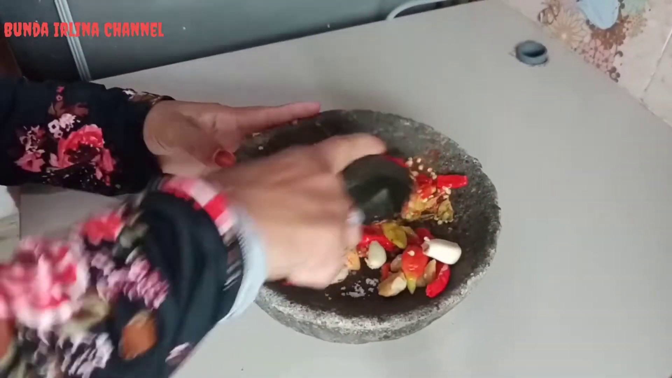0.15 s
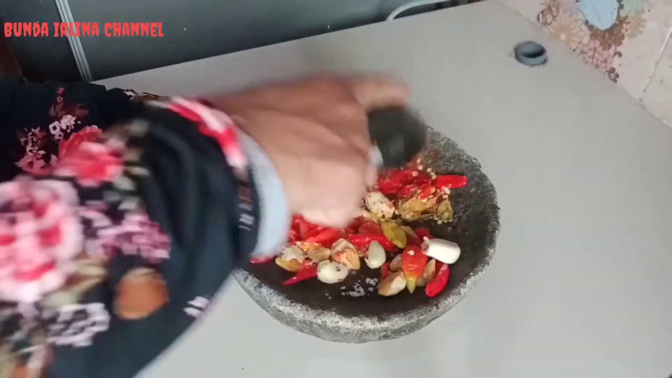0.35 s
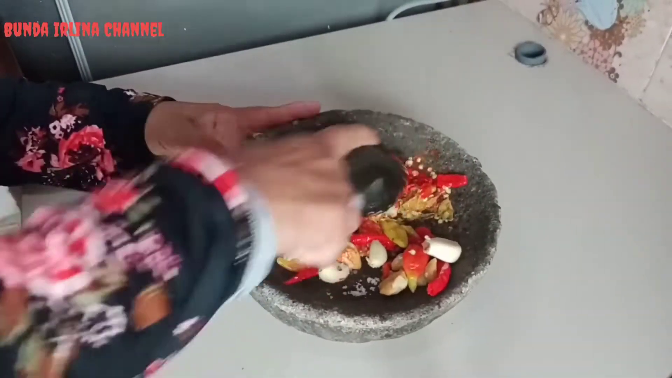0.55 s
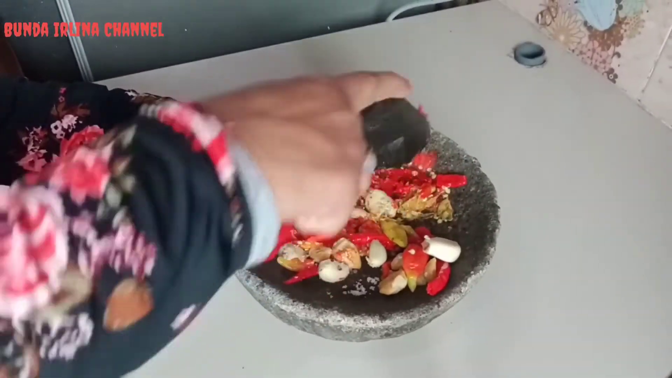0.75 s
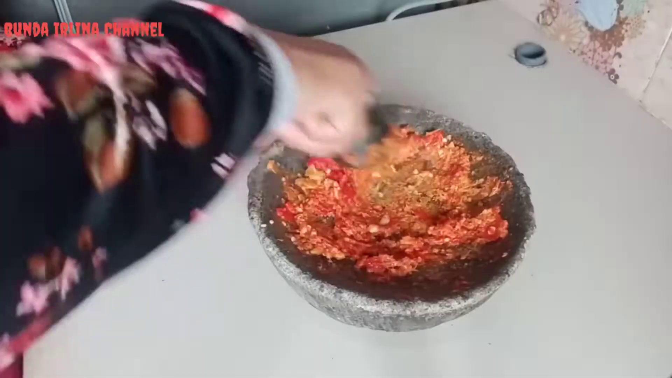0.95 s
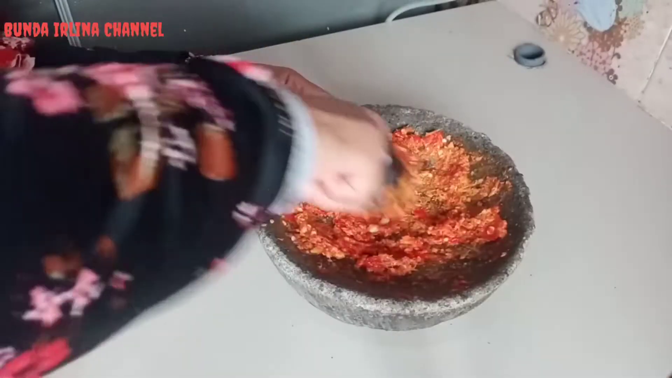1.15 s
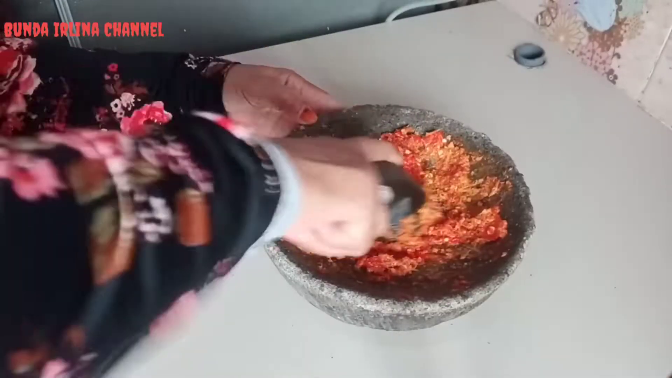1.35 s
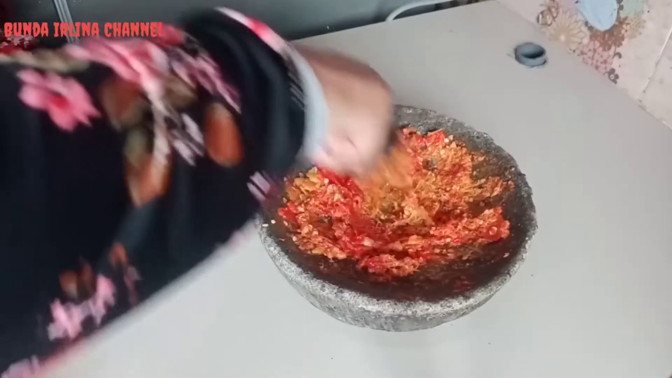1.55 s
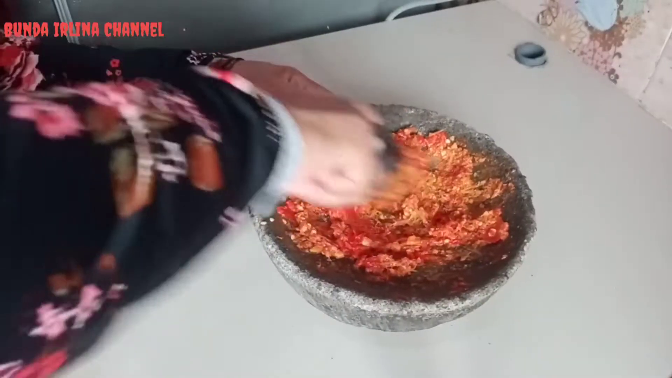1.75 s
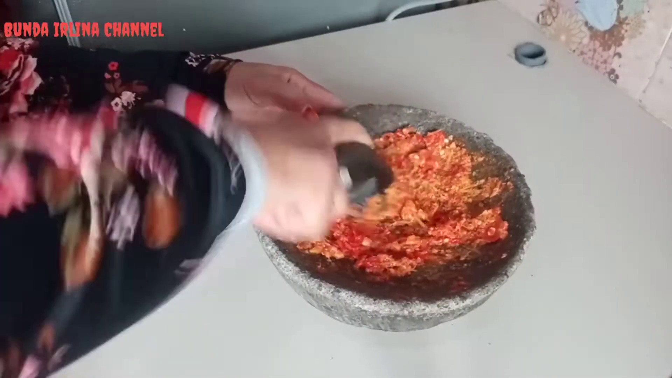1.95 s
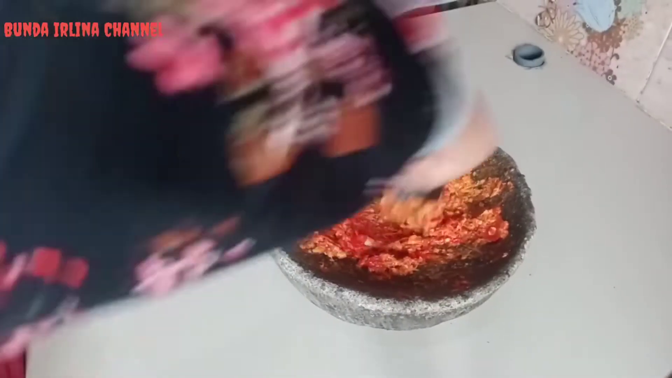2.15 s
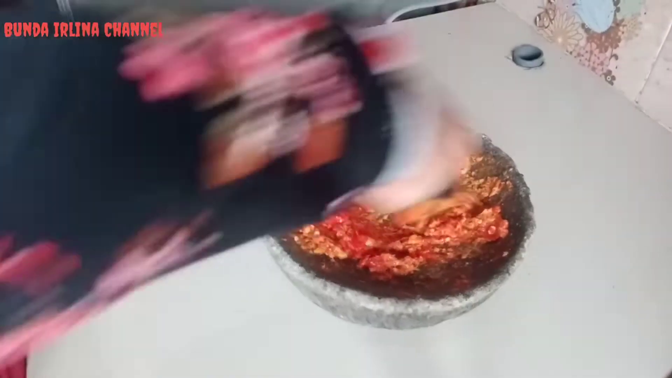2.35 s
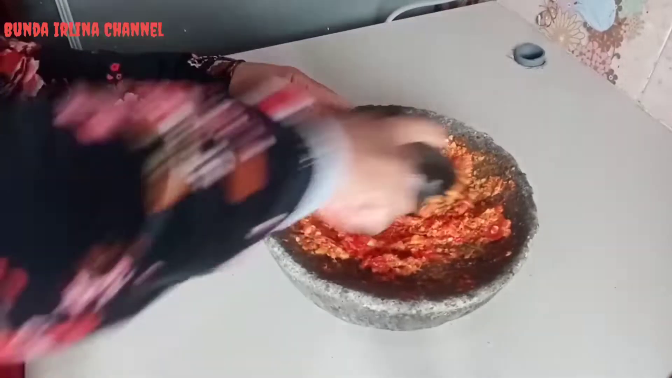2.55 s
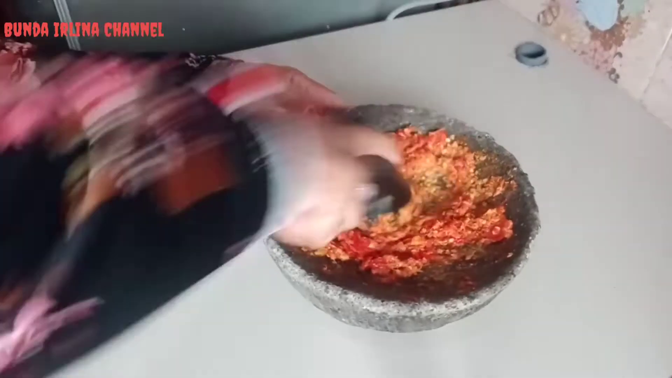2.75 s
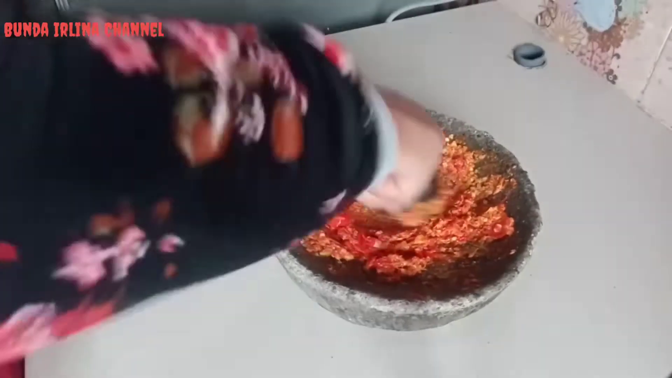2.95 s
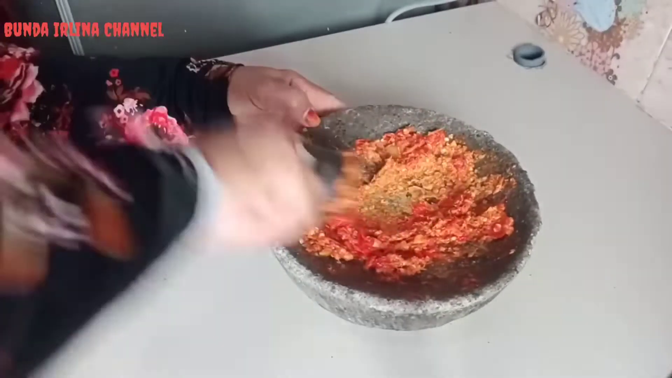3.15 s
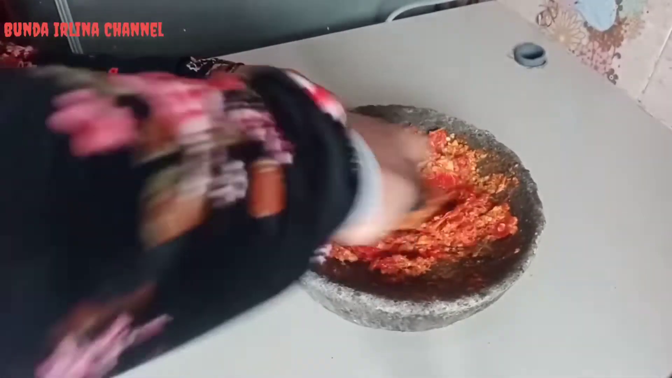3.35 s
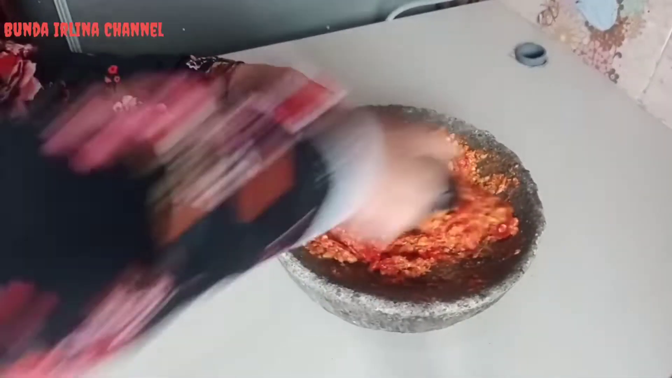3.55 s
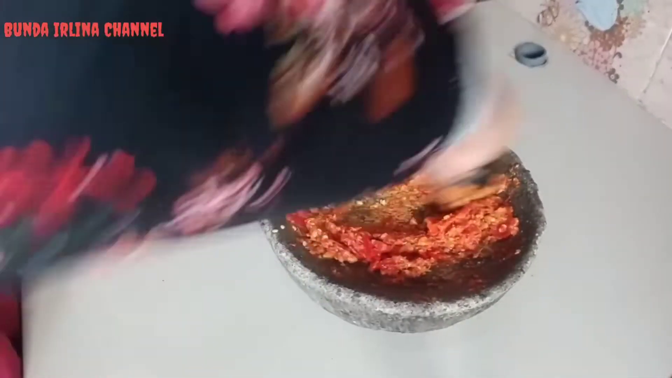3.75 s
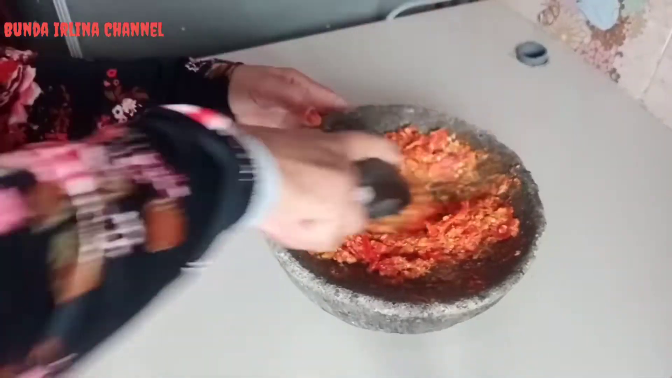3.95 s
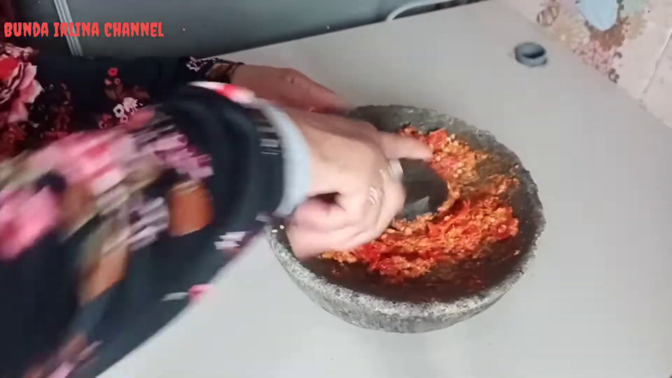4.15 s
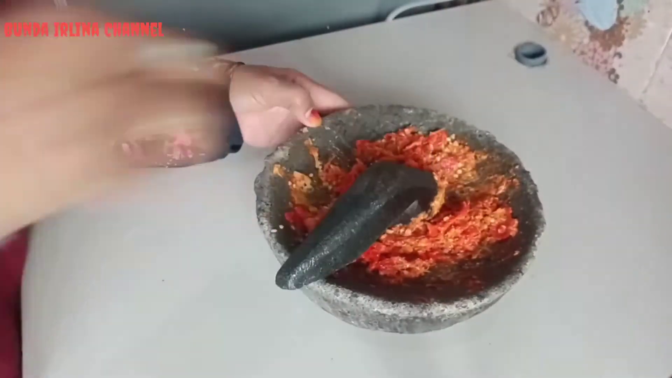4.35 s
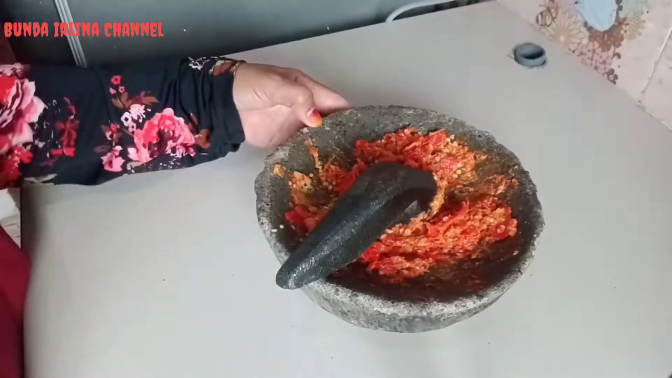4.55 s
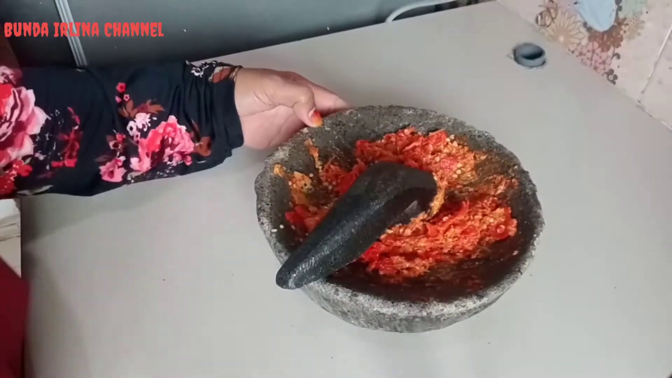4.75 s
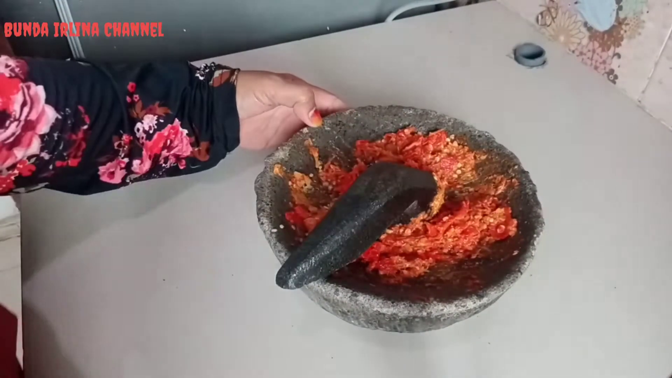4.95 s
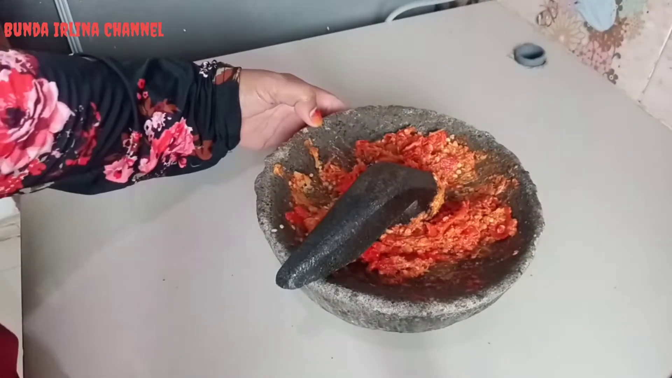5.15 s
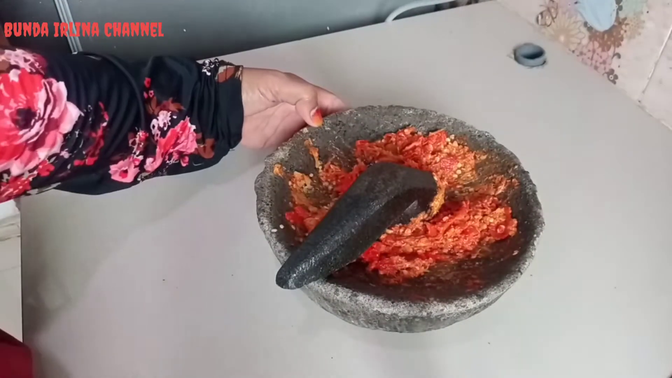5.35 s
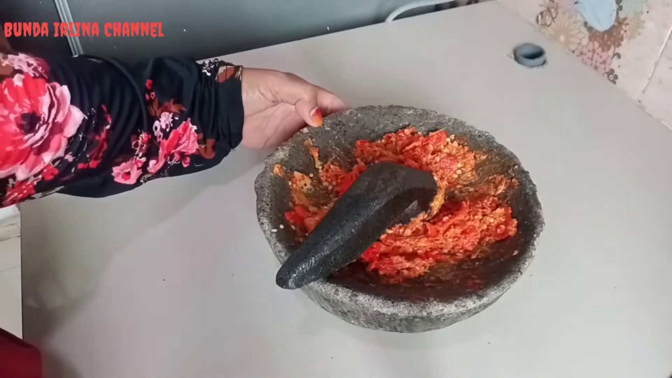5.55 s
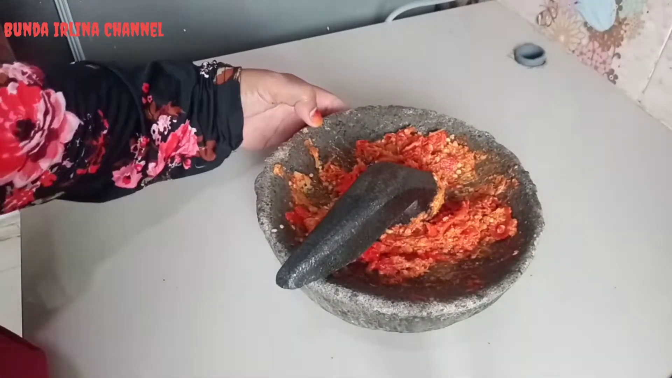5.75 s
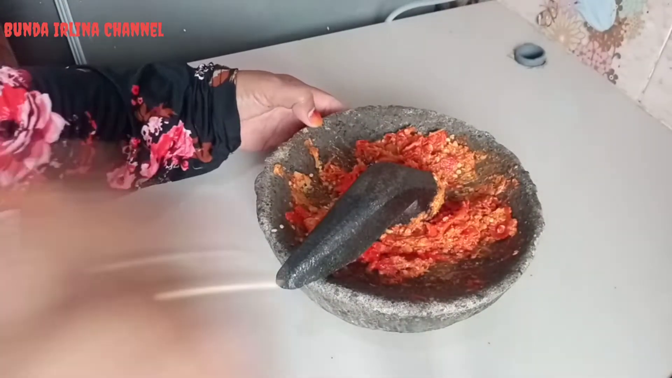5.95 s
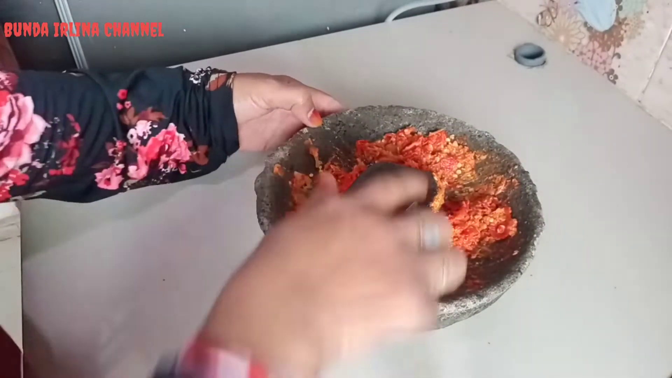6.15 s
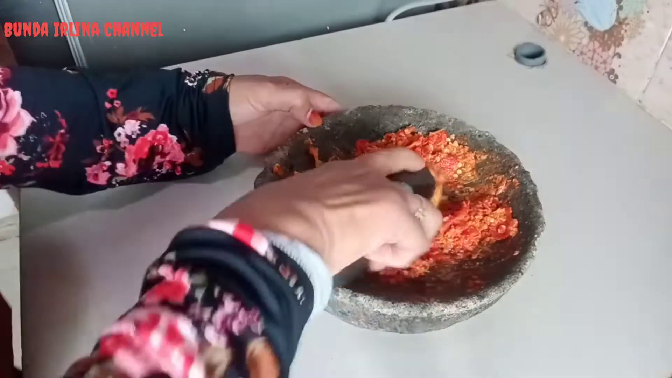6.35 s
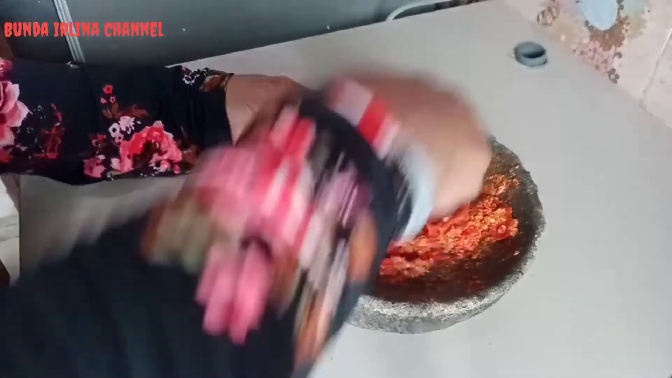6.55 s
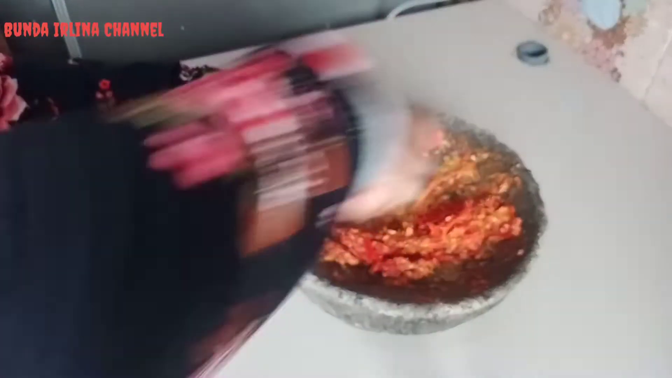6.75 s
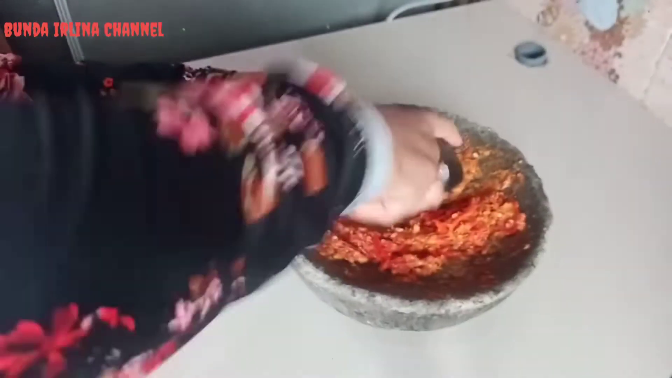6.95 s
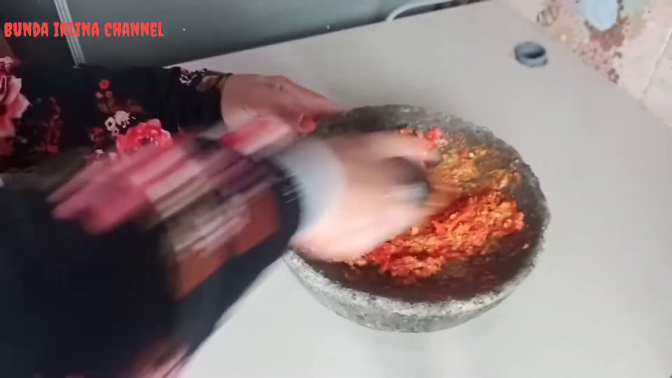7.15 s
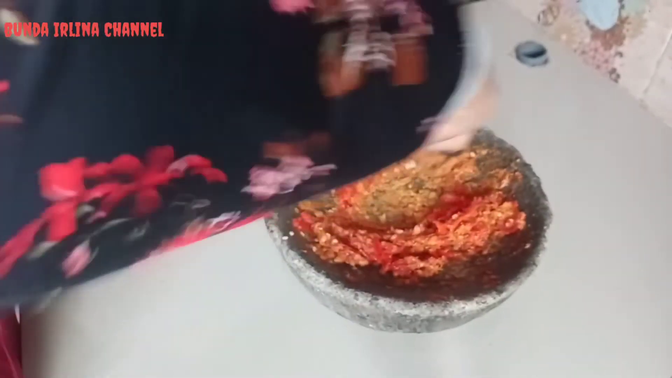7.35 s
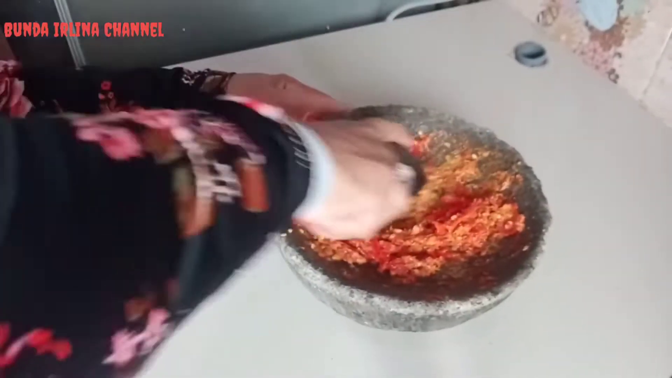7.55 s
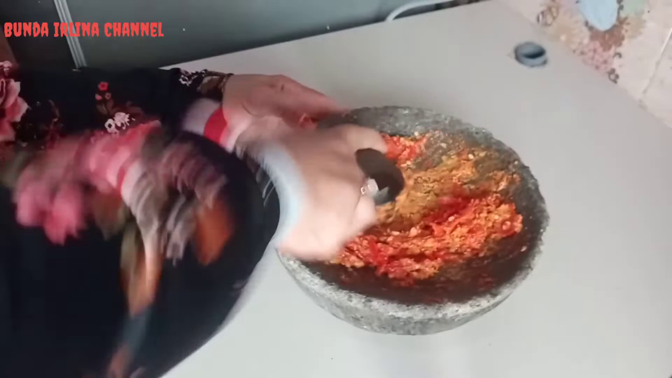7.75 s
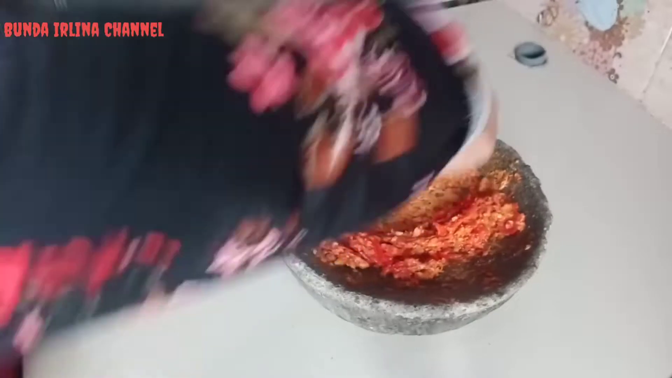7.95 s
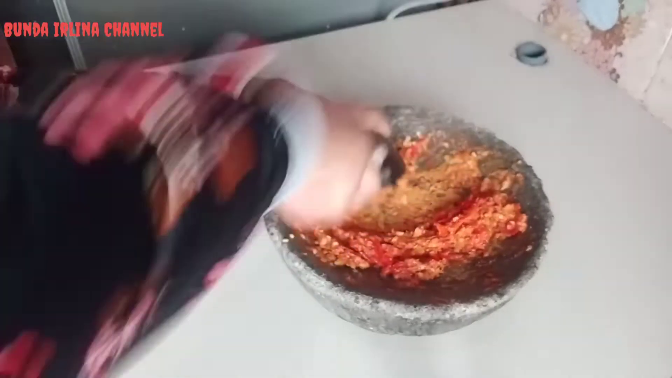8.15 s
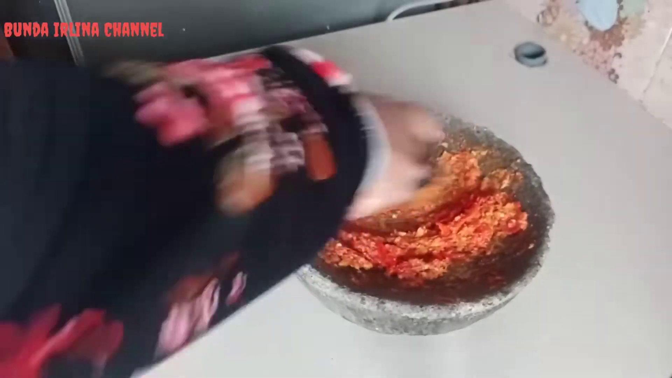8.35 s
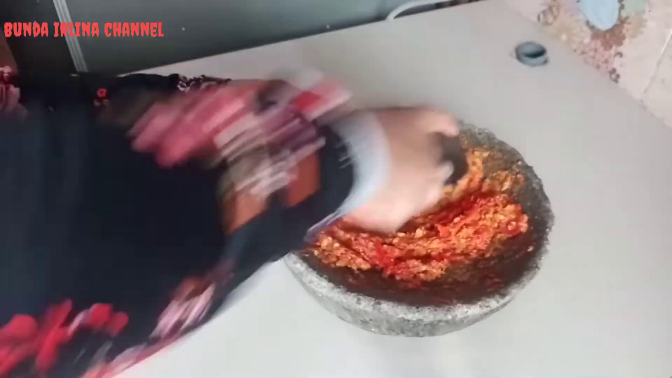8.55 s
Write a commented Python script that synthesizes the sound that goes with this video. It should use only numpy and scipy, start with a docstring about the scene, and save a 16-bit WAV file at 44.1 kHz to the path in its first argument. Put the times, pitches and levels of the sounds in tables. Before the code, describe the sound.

A stone pestle crushes crunchy chillies with three heavy blows, then knocks, scrapes and squelches through wet paste in a stone mortar, pausing midway.

```python
"""In a hard-walled kitchen, a stone pestle works chillies and spices in a stone mortar on a table.
Three blows crush the whole pods; then each stroke knocks, scrapes and squelches through the wet paste.
Midway the pestle is laid down with a clink, and a small bird is heard chirping some way off.
Stone sounds are noise or clicks through resonances, plus fading tones; grit and paste are showers of
tiny ringing bursts; the bird is a falling tone; the room adds filtered noise and fading echoes."""
import sys
import numpy as np
from scipy import signal
from scipy.fft import rfft, irfft
from scipy.io import wavfile
from scipy.ndimage import uniform_filter1d, minimum_filter1d

SR = 44100
rng = np.random.default_rng(int(sys.argv[2]) if len(sys.argv) > 2 else 0)


def waveform_to_disk(signal):
    """Save audio, clipped to [-1, 1], as 16-bit WAV at the path in sys.argv[1]."""
    frames = np.transpose(np.atleast_2d(signal))
    scaled = np.clip(frames, -1, 1) * 32767
    samples = np.round(scaled).astype(np.int16)
    wavfile.write(sys.argv[1], SR, samples)


N = 383669
TIME = np.arange(N) / SR
HIT_TIME = TIME[:SR]  # the first second, used as the clock of a single hit

# Stone meets stone. Each row: start in seconds, then relative levels in dB of the bowl,
# the table thud and the pestle ring.
KNOCKS = [(0.989, -34, -48, -63), (1.096, -28, -31.5, -53), (1.118, -17, -27.5, -23),
          (1.231, -31.5, -49, -58), (1.383, -34.5, -48, -57), (1.496, -39, -41.5, -73),
          (1.696, -12, -25, -24.5), (1.706, -14, -44, -21), (2.049, -34.5, -32.5, -53.5),
          (2.163, -33, -35, -60), (2.348, -15.5, -22.5, -36), (2.372, -16.5, -34, -42),
          (2.726, -27.5, -31, -57), (2.882, -35, -35, -73), (3.205, -14.5, -45, -34),
          (3.532, -25.5, -27, -46), (3.568, -27.5, -26, -46), (3.643, -28, -54, -58),
          (3.78, -16, -27, -19.5), (3.815, -18.5, -31, -44), (3.904, -32.5, -42.5, -53),
          (4.004, -30.5, -39, -57), (4.312, -18.5, -33, -19), (6.355, -39, -41.5, -65),
          (6.427, -43.5, -48, -69.5), (6.704, -10.5, -21, -24.5), (6.741, -19.5, -29, -33),
          (6.927, -32.5, -56.5, -53), (7.073, -24, -50, -48.5), (7.235, -31.5, -36, -59.5),
          (7.381, -8, -28.5, -27), (7.492, -15.5, -27.5, -29), (7.655, -25, -33, -44.5),
          (7.868, -31.5, -26.5, -47), (7.958, -30, -65, -58), (8.1, -16, -20, -37),
          (8.132, -11.5, -36, -22.5), (8.253, -24, -25, -37.5), (8.449, -24, -32, -39.5),
          (8.519, -23.5, -41, -39.5), (8.547, -23, -28.5, -41), (8.633, -21.5, -55, -42.5)]
# Resonances of the stone mortar. Each row: frequency in Hz, width in Hz, relative level in dB.
MORTAR = [(119.3, 1.3, -11.5), (204.6, 4.3, -0.5), (303.5, 31, -6.5), (364, 48.5, 1.5), (488.3, 34, 3),
          (692, 34, -8.5), (738.7, 16, -5.5), (1003, 49, -6), (1126, 39, 1), (1503, 63, -7.5),
          (1700, 66, -7), (1918, 30, -7.5), (2480, 25, -12), (3073, 88, -27), (3180, 42, -17),
          (4015, 26, -23.5), (4330, 18, -34), (6940, 62, -9.5), (7440, 120, -45.5), (8350, 130, -24),
          (8950, 200, -21), (9800, 69, -18)]
# The table under a blow. Each row: frequency in Hz, relative level in dB, time to fall 60 dB in seconds.
TABLE = [(124.4, -5.5, 0.32), (195.4, -9.5, 0.37), (172, -8, 0.13), (218, -11.5, 0.049),
         (297, -27.5, 0.028)]
# Colour of the mortar's dense, quickly damped resonances. Each row: frequency in Hz, relative level in dB.
GRIT = [(100, -3), (280, 11), (600, 5), (1400, 0), (2700, -30), (3500, -18.5), (4400, -27), (5300, -73),
        (9000, -39), (15000, -48)]
# Colour of a sharp crack. Each row: frequency in Hz, relative level in dB.
CRACK = [(1500, -13), (2800, 13.5), (4300, 6.5), (5500, -14), (9000, -1), (15000, -34.5)]
# Colour of the wet paste. Each row: frequency in Hz, relative level in dB.
PASTE = [(1500, -16.5), (3800, -10), (5200, -20), (7000, -8), (8800, -1.5), (10200, -9.5), (11500, -16),
         (15500, -16)]


def amp(db):
    """Turn decibels into a gain."""
    return 10 ** (np.asarray(db) / 20)


def unit(x):
    """Scale a sound to an average (rms) level of 1."""
    return x / np.sqrt(np.mean(x ** 2) + 1e-20)


def unit_attack(x, size=660):
    """Scale a blow so that its first 15 ms (660 samples) have rms 1."""
    return x / np.sqrt(np.mean(x[:size] ** 2) + 1e-20)


def add(out, s, sound):
    """Mix a sound in at a time in seconds."""
    start = max(round(s * SR), 0)
    out[start:start + len(sound)] += sound[:max(N - start, 0)]


def at_hz(points, hz):
    """Read a table between its rows, on a log-frequency axis."""
    f, value = np.transpose(points)
    return np.interp(np.log(np.maximum(hz, 1)), np.log(f), value)


def dying(t, t60):
    """Exponential decay that falls 60 dB in t60 seconds."""
    return np.exp(-np.log(1000) * t / t60)


def drift(rate):
    """A random wobble of rms 1: straight lines between about this many random points a second."""
    return unit(np.interp(TIME * min(rate, 900), np.arange(SR), rng.standard_normal(SR)))


def colour(x, spectrum, skirt_db=14, size=8192):
    """Filter with the given spectrum and no pre-echo (minimum phase), falling away beyond its ends."""
    hz = np.maximum(np.fft.rfftfreq(size, 1 / SR), 1)
    octaves_outside = np.abs(np.log2(hz / np.clip(hz, spectrum[0][0], spectrum[-1][0])))
    level_db = at_hz(spectrum, hz) - skirt_db * octaves_outside
    cepstrum = irfft(np.log(amp(level_db)))
    # folding the cepstrum forward in time makes the filter minimum phase
    fold = 1 + np.sign(size / 2 - np.arange(size))
    fold[0] = 1
    impulse = irfft(np.exp(rfft(cepstrum * fold)))
    return signal.fftconvolve(x, impulse)[:len(x)]


def resonance(x, hz, width):
    """Two-pole resonance with gain 1 on top; the narrower it is, the longer it rings."""
    r = np.exp(-np.pi * width / SR)
    top = np.array([1, 0, -1]) * (1 - r * r) / 2
    return signal.lfilter(top, [1, -2 * r * np.cos(2 * np.pi * hz / SR), r * r], x + 1e-18)


def struck(modes, size=18000):
    """A struck solid: a sum of dying tones, with new strengths at every blow."""
    t = HIT_TIME[:size]
    strengths = amp(1.5 * rng.standard_normal(len(modes)))
    tones = [g * amp(db) * dying(t, t60) * np.sin(2 * np.pi * hz * t)
             for g, (hz, db, t60) in zip(strengths, modes)]
    return unit_attack(sum(tones))


def grains(n, per_s, spread_db):
    """Random clicks, many small and a few large."""
    sizes = amp(spread_db * np.minimum(rng.exponential(1, n), 4))
    return (rng.random(n) < per_s / SR) * sizes * rng.choice([-1, 1], n)


def crackle(pitches, per_s, spread_db, sharpness, clumps_db, clumps_per_s):
    """Tiny bursts, each ringing a few cycles at one of the pitches; every pitch comes in clumps."""
    out = 0
    for hz in pitches:
        clicks = grains(N, per_s, spread_db) * amp(clumps_db * drift(clumps_per_s))
        out = out + resonance(clicks, hz, hz / sharpness)
    return out


def background(air_db=-57):
    """Filtered noise: faint room hiss over a low, wavering drone; a sleeve brushes past."""
    # Colours of hiss, drone and sleeve. Each row: frequency in Hz, relative level in dB.
    air_colour = [(25, -18), (60, 17.5), (300, 3.5), (600, 5), (1200, -0.5), (3000, -1), (5500, -9.5),
                  (7500, -12.5), (9000, -4.5), (11000, -18.5), (15000, -20)]
    rumble_colour = [(45, -24.5), (55, -55), (67, 5), (90, -8), (110, -9), (126, 10), (145, -7.5),
                     (250, -37.5)]
    sleeve_colour = [(300, -9), (470, 5.5), (650, -8.5), (850, -5.5), (1300, -13.5), (4000, -16.5),
                     (10000, -25)]
    # The low room rumble. Each row: time in seconds, level in dB.
    rumble = [(0.0, -36), (0.12, -47.5), (1.02, -53), (1.24, -55), (3.63, -43), (4.48, -57), (5.72, -45),
              (7.12, -56), (8.38, -46.5), (8.7, -41)]
    # The arm reaches back for the pestle. Each row: time in seconds, level in dB.
    reach = [(5.6, -85), (5.82, -57.5), (6.1, -54.5), (6.3, -62), (6.7, -76), (6.9, -83)]
    air = amp(air_db) * unit(colour(rng.standard_normal(N), air_colour))
    drone_level = amp(np.interp(TIME, *np.transpose(rumble)))
    drone = drone_level * unit(colour(rng.standard_normal(N), rumble_colour))
    sleeve_level = amp(np.interp(TIME, *np.transpose(reach)))
    sleeve = sleeve_level * unit(colour(rng.standard_normal(N), sleeve_colour))
    return air + drone + sleeve


def kitchen_tail(first_echo_s=0.0077, count=10):
    """Diffuse echoes: bands of noise that die at their own rates, with total energy 1."""
    # Kitchen reverberation. Each row: frequency in Hz, time to fall 60 dB in seconds.
    kitchen = [(100, 0.86), (400, 0.8), (1000, 0.55), (2300, 0.56), (4500, 0.32), (9000, 0.51),
               (16000, 0.3)]
    edges = np.geomspace(60, 17000, count)
    tail = 0
    for low, high in zip(edges, edges[1:]):
        band_filter = signal.butter(2, [low, high], "band", fs=SR, output="sos")
        band = signal.sosfilt(band_filter, rng.standard_normal(SR))
        tail = tail + band * dying(HIT_TIME, at_hz(kitchen, np.sqrt(low * high)))
    tail = tail * (HIT_TIME > first_echo_s)
    return tail / np.linalg.norm(tail)


def bird(level_db=-2, octave_db=-17, warble_db=4.5):
    """A thin whistle that falls about an octave; its pitch varies by chirp and its level flutters."""
    # One falling chirp. Each row: seconds after its start, typical pitch in Hz, relative level in dB.
    chirp_shape = [(0, 8260, -15), (.006, 8150, -14.5), (0.014, 6850, -5.5), (.021, 5990, -2),
                   (.033, 5200, -6.5), (.045, 4620, -9.5), (0.055, 4200, -42)]
    # Even runs of calls. Each row: first chirp in seconds, number of chirps, interval in seconds,
    # relative level in dB.
    chirp_runs = [(1.985, 1, .25, -46), (2.655, 5, .256, -39.5), (4.167, 5, .239, -46.5),
                  (5.348, 3, 0.23, -40.5), (6.075, 3, .251, -40.5), (6.817, 5, .244, -44)]
    out = np.zeros(N)
    when, pitch, loud = np.transpose(chirp_shape)
    t = TIME[TIME < when[-1]]
    for first, count, interval, db in chirp_runs:
        for k in range(round(count)):
            detune = 1 + 0.0102 * rng.normal()
            phase = 2 * np.pi * np.cumsum(np.interp(t, when, pitch)) / SR * detune
            whistle = amp(np.interp(t, when, loud)) * np.sin(phase)
            # the overtone is strongest as the pitch sinks
            overtone = amp(octave_db) * np.sqrt(np.sin(np.pi * (t / when[-1]) ** 2)) * np.sin(2 * phase)
            add(out, first + k * interval, amp(db + level_db) * (whistle + overtone))
    return out * amp(warble_db * drift(300))


def singing(held_t60_s=.7, free_t60_s=1.55):
    """The pestle sings on after a contact: two close tones beat, dying faster in the hand than free."""
    # The pestle's longest-lived mode, a close pair. Each row: frequency in Hz, level in dB against the ring.
    close_pair = [(2297, -22), (2309, -29)]
    # The pestle lies free: from and to, in seconds.
    laid_down = (4.3, 6.2)
    out = np.zeros(N)
    tone = sum(amp(db) * np.sqrt(2) * np.sin(2 * np.pi * hz * HIT_TIME) for hz, db in close_pair)
    for s, bowl, thud, ring in KNOCKS:
        free = laid_down[0] < s < laid_down[1]
        add(out, s, amp(ring) * tone * dying(HIT_TIME, free_t60_s if free else held_t60_s))
    return out


def paste(wet, squelch_db=-4.5, pop_db=-13, pop_t60=0.086, count=26, size=2000):
    """Tiny wet films burst as the paste is squeezed; now and then a larger pop is a dying noise burst."""
    # Seeds and air pockets burst. Each row: start in seconds, relative level in dB.
    pops = [(1.056, -30), (2.338, -25), (2.4803, -24.5), (2.603, -26.5), (2.8, -28.5), (3.1782, -25),
            (3.6017, -19.5), (7.1122, -21.5), (7.7653, -20.5), (8.4587, -28), (8.5993, -20.5)]
    pitches = np.geomspace(3000, 15000, count)
    fizz = crackle(pitches, per_s=300, spread_db=2.5, sharpness=17.5, clumps_db=6, clumps_per_s=45)
    out = amp(squelch_db) * wet * unit(colour(fizz, PASTE))
    for s, db in pops:
        burst = rng.standard_normal(size) * dying(HIT_TIME[:size], pop_t60)
        add(out, s, amp(db + pop_db) * unit_attack(colour(burst, PASTE)))
    return out


def scraping(rub, wet, scrape_db=-1, crunch_db=-1, rub_crunch_db=-15, wet_crunch_db=-14, edge_s=0.0045,
             pestle_db=-5, pestle_hz=2210, pestle_width_hz=90, count=18):
    """Stone grains catch and slip in clumps, shaking bowl and pestle; grit is crushed between them."""
    # The pestle bites through to bare stone. Each row: start in seconds, length in seconds,
    # relative level in dB, crunch in dB against that level.
    scrapes = [(1.757, 0.077, -21, -14.5), (2.03, 0.037, -35.5, -12), (3.179, 0.015, -25, -32),
               (3.214, 0.04, -16, -12), (3.255, 0.032, -17.5, -15), (3.505, 0.045, -28.5, -13),
               (7.416, 0.075, -18.5, -15), (8.074, 0.018, -21, -36), (8.097, 0.027, -22.5, -4),
               (8.262, 0.021, -22.5, -12), (8.541, 0.008, -25.5, -5)]
    # Colour of crushed grit. Each row: frequency in Hz, relative level in dB.
    granules = [(900, -2), (2000, 14), (3200, 3.5), (4300, 5.5), (4900, -28.5), (5600, -25)]
    pressure = rub
    crushing = amp(rub_crunch_db) * rub + amp(wet_crunch_db) * wet
    for s, length, db, crunch in scrapes:
        corners = [s - edge_s / 2, s + edge_s / 2, s + length, s + length + 2 * edge_s]
        bite = np.interp(TIME, corners, [0, 1, 1, 0])
        pressure = pressure + amp(db + scrape_db) * bite
        crushing = crushing + amp(db + crunch + crunch_db) * bite
    # as the contact point travels, each resonance is driven now more, now less
    coupling = [amp(db + 3.5 * drift(28)) for hz, width, db in MORTAR]

    def body(force):
        """Both stones answer each slip with their resonances."""
        bowl = sum(resonance(force * g, hz, width) for g, (hz, width, db) in zip(coupling, MORTAR))
        pestle = amp(pestle_db) * resonance(force, pestle_hz, pestle_width_hz)
        return bowl + amp(-8.5) * colour(force, GRIT) + pestle

    slips = grains(N, 2800, 2.8) * amp(3.2 * drift(120))
    stones = body(slips * pressure) / np.std(body(slips))
    pitches = np.geomspace(1300, 5000, count)
    grit = crackle(pitches, per_s=350, spread_db=4, sharpness=22, clumps_db=4, clumps_per_s=50)
    return stones + crushing * unit(colour(grit, granules))


def grinding(rub_db=-4, stroke_rub_db=-2, land_s=.008, lift_t60_s=.3, push_rise=0.52):
    """Each stroke rubs and squelches lightly until the pestle lifts; each push of the wrist swells both."""
    # The pestle stays in the paste from landing to lifting. Each row: from and to in seconds,
    # relative squelch level in dB.
    strokes = [(1.033, 1.505, -46.5), (1.688, 2.18, -52.5), (2.342, 2.987, -44.5), (3.182, 3.666, -43),
               (3.783, 4.254, -49.5), (6.327, 6.62, -54), (6.695, 7.275, -49.5), (7.38, 7.98, -44.5),
               (8.114, 8.64, -47)]
    # Pushes of the wrist. Each row: peak time in seconds, length in seconds,
    # then relative levels in dB of rubbing and squelch.
    pushes = [(1.105, 0.037, -55, -36), (1.78, 0.22, -49, -48), (1.95, 0.067, -25.5, -40),
              (2.103, 0.14, -46, -34), (2.364, 0.056, -25, -49), (2.437, 0.098, -27, -40),
              (2.6, 0.15, -36.5, -49), (2.714, 0.071, -31.5, -48), (2.883, 0.079, -51, -40),
              (3.258, .17, -47, -36), (3.432, 0.14, -51, -36.5), (3.572, .15, -31, -35),
              (3.972, 0.31, -40.5, -48), (6.513, 0.065, -74, -44), (6.812, 0.053, -44, -40),
              (6.939, 0.063, -37, -38), (7.116, 0.16, -40, -40.5), (7.238, 0.12, -41.5, -39.5),
              (7.489, 0.15, -24, -46), (7.649, 0.061, -37.5, -39), (7.75, 0.1, -24, -38),
              (7.919, 0.096, -34, -36.5), (8.151, 0.16, -29, -29), (8.29, .12, -24, -46),
              (8.387, 0.14, -39, -44), (8.466, 0.048, -22, -28.5), (8.579, 0.095, -33, -38)]
    wet = 0
    for start, end, db in strokes:
        # the paste is met at once and lets go slowly
        landing = np.clip((TIME - start) / land_s, 0, 1)
        lifting = dying(np.maximum(TIME - end, 0), lift_t60_s)
        wet = wet + amp(db) * landing * lifting
    rub = amp(stroke_rub_db) * wet
    for s, length, rubbing, squelch in pushes:
        # push_rise is the share of a push spent swelling
        swell = np.interp(TIME, [s - push_rise * length, s, s + (1 - push_rise) * length], [0, 1, 0])
        rub = rub + amp(rubbing) * swell
        wet = wet + amp(squelch) * swell
    return scraping(amp(rub_db) * rub, wet) + paste(wet)


def mortar(force, grit_db):
    """The bowl's resonances over a bed of dense, quickly damped ones."""
    out = amp(grit_db) * colour(force, GRIT)
    for k, (hz, width, db) in enumerate(MORTAR):
        out = out + (-1) ** k * resonance(force, hz, width) * amp(db)
    return out


def knocks(thud_db=-3, ring_db=7.0, crack_db=-15, crack_per_ring=.15, chatter=0.08, chatter_t60=0.049,
           crack_t60=0.078, contact_hz=3900, hardening=0.59, size=16000):
    """A contact and brief chatter on rough stone; less paste between means harder, with more ring and crack."""
    # Ringing of bare stone on stone. Each row: frequency in Hz, relative level in dB,
    # time to fall 60 dB in seconds.
    pestle = [(853, -16, .07), (1107, -7.5, 0.053), (1557, -25.5, .08), (1880, -13, 0.097),
              (2087, -14, 0.13), (2186, 5.5, 0.047), (2282, 20, 0.042), (2254, -6.5, 0.058),
              (2640, -4.5, 0.094), (3420, -32.5, 0.081), (4150, -32.5, 0.084), (4770, -16.5, 0.07),
              (11600, -49, .12)]
    out, t = np.zeros(N), HIT_TIME[:size]
    for s, bowl, thud, ring in KNOCKS:
        # the more ring against bowl, the brighter the contact
        cutoff = np.clip(contact_hz * amp(hardening * (ring - bowl)), 300, SR / 4)
        contact = signal.butter(2, cutoff, fs=SR, output="sos")
        force = chatter * rng.standard_normal(size) * dying(t, chatter_t60)
        force[0] += 1
        crack = bowl + crack_per_ring * (ring - bowl)
        snap = rng.standard_normal(size) * dying(t, crack_t60)
        add(out, s, amp(bowl) * unit_attack(mortar(signal.sosfilt(contact, force), grit_db=-17.5)))
        add(out, s, amp(thud + thud_db) * struck(TABLE))
        add(out, s, amp(ring + ring_db) * struck(pestle))
        add(out, s, amp(crack + crack_db) * unit_attack(colour(snap, CRACK)))
    return out


def pounds(snap_db=-3, thud_db=-11, bowl_db=-13, crunch_db=-3, rise_s=0.0019, crush_s=0.0061,
           squash_t60=0.052, cushion_s=0.00432, soft_hz=700):
    """The pod splinters and its softened force shakes the bowl; the table thud follows a moment later."""
    # Blows on whole pods. Each row: start in seconds, relative level in dB,
    # then crunch and crack in dB against that level.
    blows = [(0.063, -10, -6, -9), (0.4377, -10.5, -3.5, -27), (0.7937, -5, -6, -24)]
    # Colour of the splintering pods. Each row: frequency in Hz, relative level in dB.
    crunch_colour = [(150, -1), (400, 18.5), (700, 12.5), (1200, 8), (2000, 1.5), (3400, 2), (5200, -8.5),
                     (7200, -3), (8900, 6), (11000, -6.5), (15000, -13)]
    out = np.zeros(N)
    crushing = np.minimum(1, HIT_TIME / rise_s) * np.minimum(1, dying(HIT_TIME - crush_s, squash_t60))
    softening = signal.butter(2, soft_hz, fs=SR, output="sos")
    for s, db, crunch, crack in blows:
        splinters = grains(SR, 12000, 4.6) * crushing
        snaps = grains(SR, 6700, 2.1) * crushing
        cushioned = signal.sosfilt(softening, splinters)
        add(out, s, amp(db + crunch + crunch_db) * unit_attack(colour(splinters, crunch_colour)))
        add(out, s, amp(db + crack + snap_db) * unit_attack(colour(snaps, CRACK)))
        add(out, s, amp(db + bowl_db) * unit_attack(mortar(cushioned, grit_db=-11.0)))
        add(out, s + cushion_s, amp(db + thud_db) * struck(TABLE))
    return out


def scene(bass_cut_hz=108):
    """The mortar is close, its deep bass filtered out; the far bird has much stronger echoes."""
    bass_cut = signal.butter(5, bass_cut_hz, "high", fs=SR, output="sos")
    near = signal.sosfilt(bass_cut, pounds() + knocks() + grinding())
    far = bird()
    echoes = signal.fftconvolve(amp(-12.5) * near + amp(-2.5) * far, kitchen_tail())[:N]
    return (near + singing() + far + echoes + background())[None]


def record(dry, size=130, ceiling=.72, cutoff_hz=15700):
    """A fast limiter holds the peaks, then a steep filter cuts the top of the treble."""
    gain = np.minimum(1, ceiling / (np.abs(dry) + 1e-9))
    # the lowest gain nearby, smoothed over about 3 ms
    gain = uniform_filter1d(minimum_filter1d(gain, size), size)
    top_cut = signal.ellip(10, .1, 80, cutoff_hz, fs=SR, output="sos")
    return signal.sosfilt(top_cut, dry * gain)


dry = scene()
out = record(dry)
waveform_to_disk(out)
```